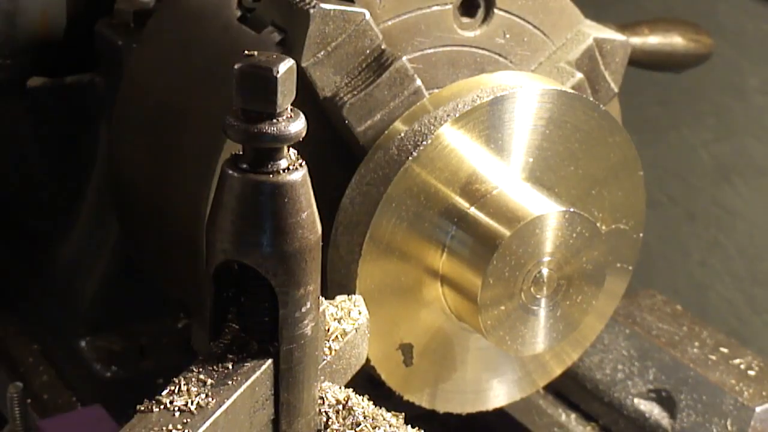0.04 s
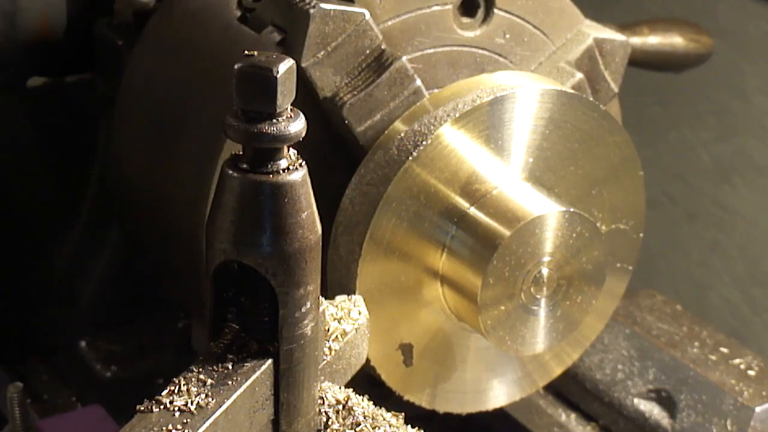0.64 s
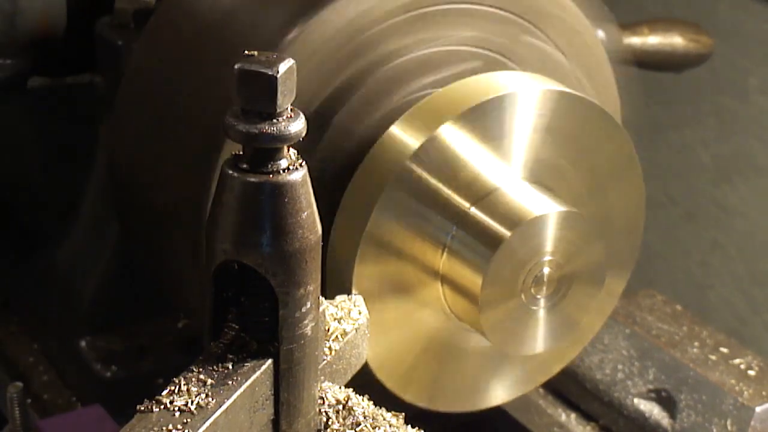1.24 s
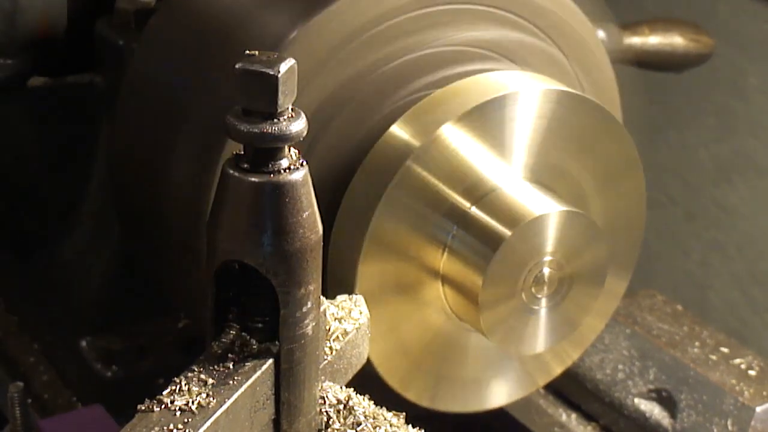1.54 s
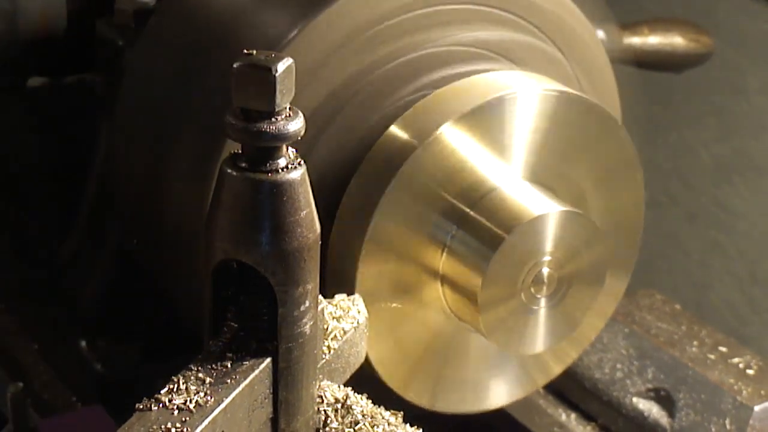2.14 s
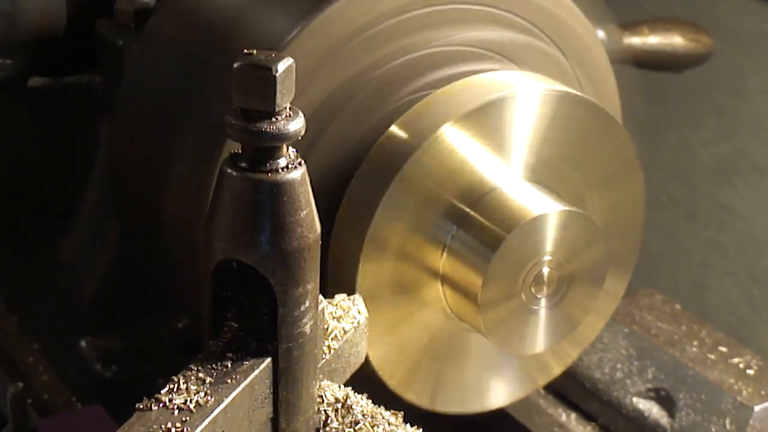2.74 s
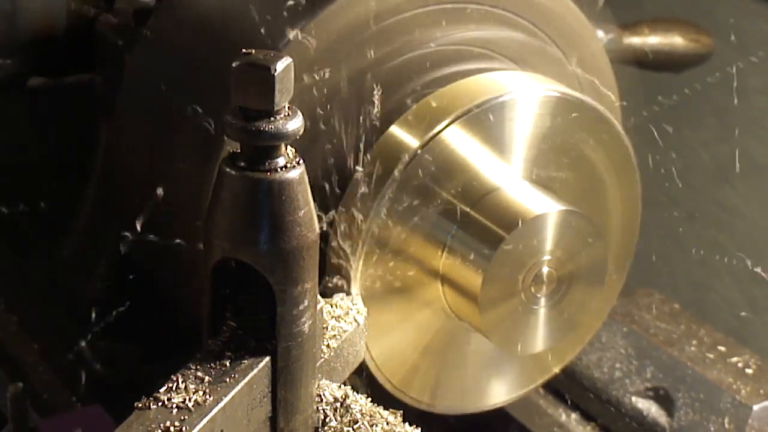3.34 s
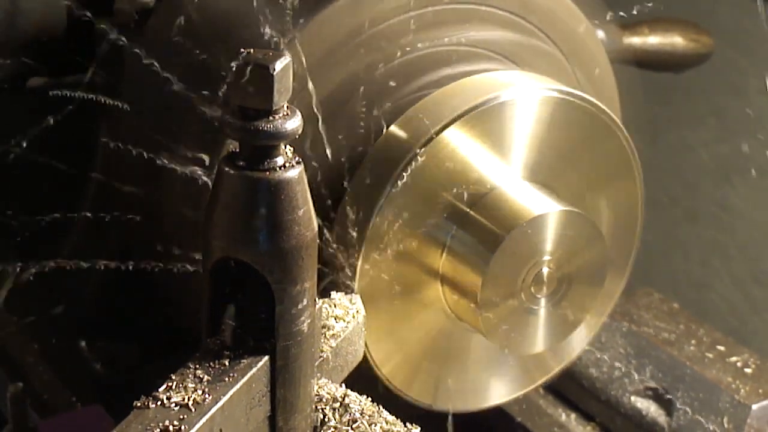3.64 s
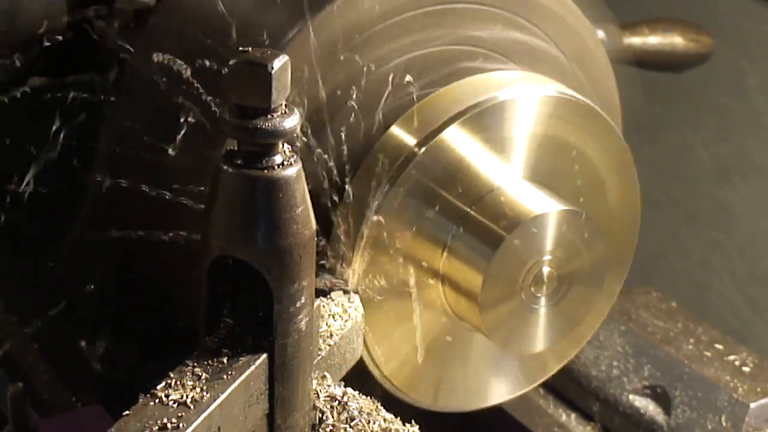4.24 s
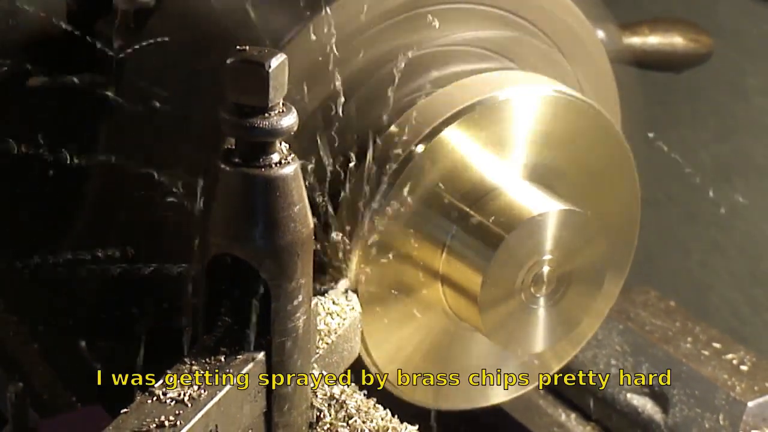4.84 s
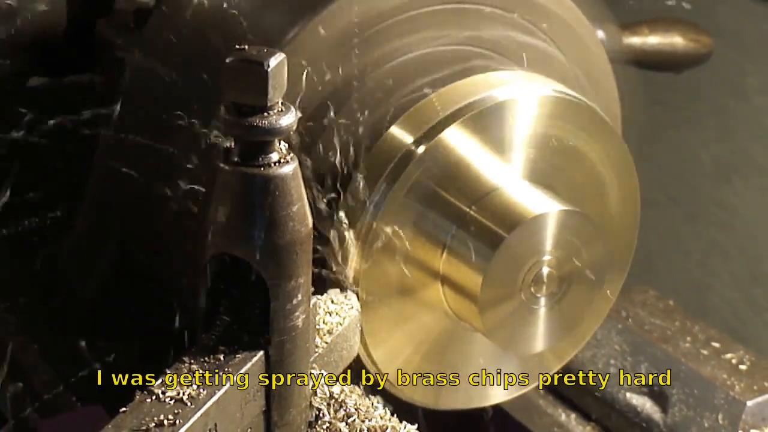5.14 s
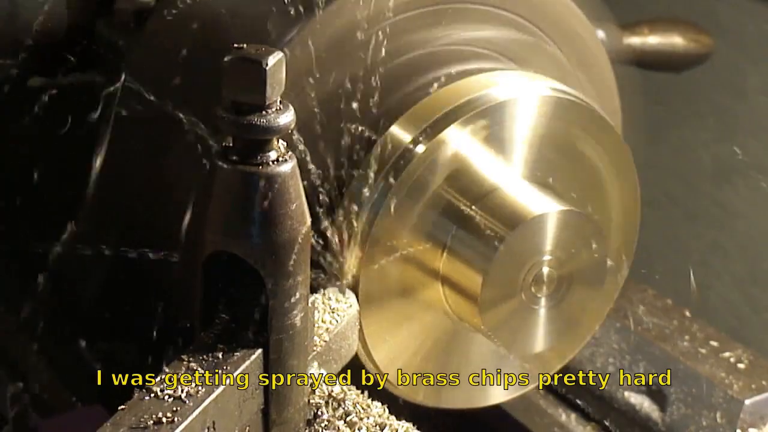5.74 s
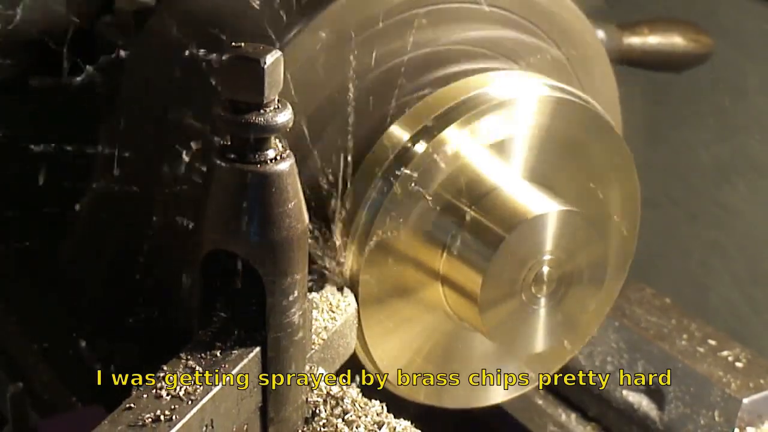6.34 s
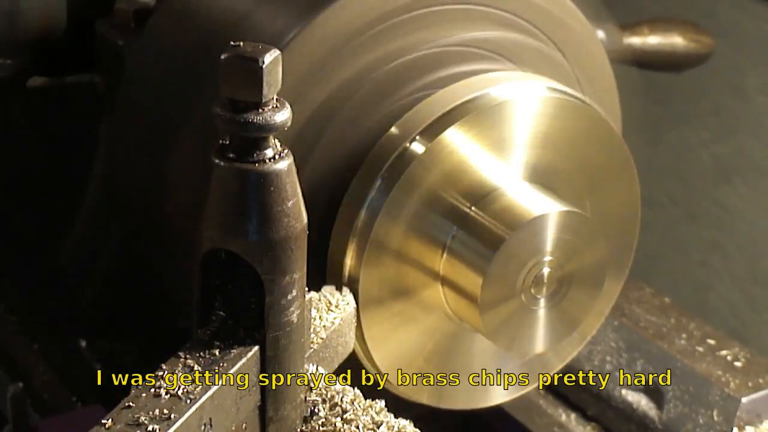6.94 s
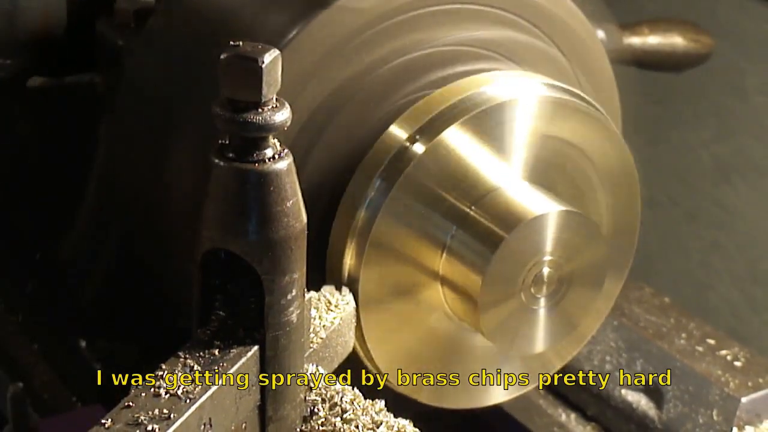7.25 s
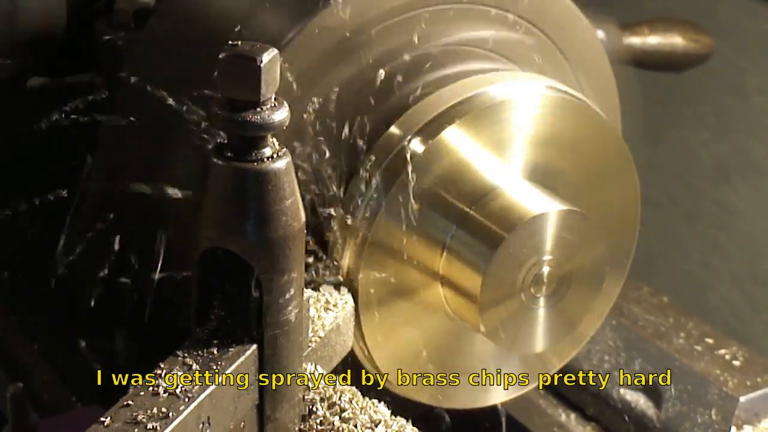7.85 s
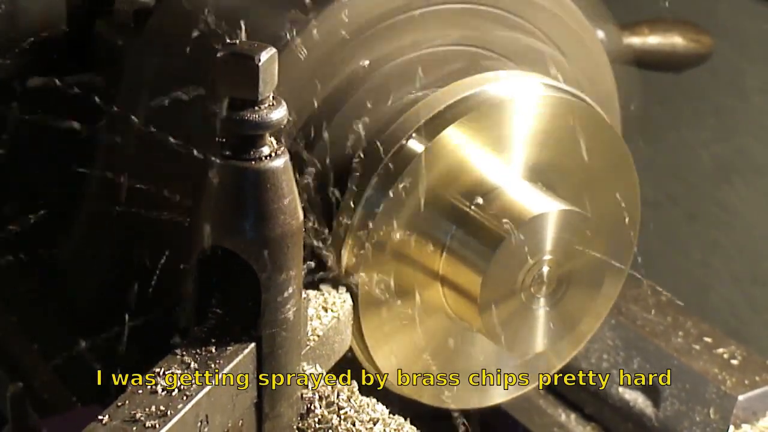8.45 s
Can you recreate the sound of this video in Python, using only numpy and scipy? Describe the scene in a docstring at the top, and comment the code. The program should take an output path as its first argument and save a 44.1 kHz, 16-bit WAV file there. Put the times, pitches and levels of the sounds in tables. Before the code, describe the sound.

A metal lathe starts up and cuts spinning brass with a bright crackling hiss, high squeals and chirps over its motor hum.

```python
"""Turning brass on a lathe

Close up in a small workshop, over the hiss of idling machinery, a motor starts, hums and whirs up to
speed, and the chuck clinks. The tool grazes a spinning brass blank, exciting a squeal once a turn,
then snags and bites: the loaded drive whines, and chips crackle and chirp as they fracture.
The tool is eased off, the brass squeals again, and the cut goes on."""
import sys
import numpy as np
from scipy import signal
from scipy.fft import rfft, irfft, next_fast_len
from scipy.io import wavfile

SR = 44100
rng = np.random.default_rng(int(sys.argv[2]) if len(sys.argv) > 2 else 0)


def int16_out(signal):
    """Quantize to a 16-bit WAV file."""
    q = np.round(np.clip(np.atleast_2d(signal).T, -1, 1) * 32767)
    wavfile.write(sys.argv[1], SR, q.astype(np.int16))


N = 375291
T = np.arange(N) / SR
FREQS = np.maximum(np.fft.rfftfreq(N, 1 / SR), 1)
START_S = 1.112   # the motor is switched on
RUN_TIME = np.maximum(T - START_S, 0)

# feeds of the tool: bite t/s, lift t/s, load (0-1), feed-in time/s
FEEDS = [(3.075, 6.846, 0.91, 0.37), (7.104, 8.6, 0.37, 0.082), (7.5, 8.6, 0.48, 0.1)]
# spectra of the tool tip rubbing, cutting and snagging: f/Hz, spectral level/dB
RUB_SPECTRUM = [(200, -42), (1500, -21), (3300, 5.5), (4200, 5), (4600, 7.5), (5150, -1), (5800, 2),
                (7000, 5.5), (7900, 1.5), (9000, -3.5), (11500, -7.5), (13200, -7), (14200, -11),
                (16000, -11)]
CUT_SPECTRUM = [(1500, -39), (3300, -1), (3750, 7.5), (4500, 3), (4900, 1), (5400, 10), (6700, 6),
                (7500, 10.5), (8700, 4), (10300, -2), (11500, -1), (13600, 4), (16000, -8.5)]
SNAG_SPECTRUM = [(1500, -37), (3400, -7), (4700, -4), (5400, 7), (6500, -12), (7900, 12), (9000, -10),
                 (11500, -20), (13200, -4), (16000, -21)]
# resonances of the tool: f/Hz, bandwidth/Hz, lift/dB
TOOL_MODES = [(4550, 150, 3), (7980, 350, 7), (13300, 1200, .5)]
TURN_S, SLOWED_TURN_S, CHATTER_S = .0402, .0407, .0252   # periods: free turn, dragged turn, tool chatter
GRAZE_HZ, SQUEAL_HZ = 7540, 8070   # ring of the blank, touched lightly and pressed
# grazing passes: start t/s, end t/s, period/s, f/Hz, touches per period, warble swing/Hz,
# first touch level/dB, settled touch level/dB, warble level/dB, touch decay time/s
GRAZING_PASSES = [(2.016, 3.095, TURN_S, GRAZE_HZ, 1, 500, -27.5, -40, -45.5, 0.0025),
                  (3.1, 3.223, TURN_S, GRAZE_HZ, 1, 350, -28.5, -39, -51, 0.0066),
                  (4.834, 6.907, CHATTER_S, SQUEAL_HZ, 1, 60, -41, -46.5, -61, .005),
                  (6.916, 7.19, SLOWED_TURN_S, SQUEAL_HZ, 2, 300, -41, -36, -49, .004),
                  (7.1975, 7.485, SLOWED_TURN_S, SQUEAL_HZ, 2, 480, -33.5, -22, -39, 0.0039),
                  (7.521, 8.52, CHATTER_S, SQUEAL_HZ, 1, 60, -37, -46, -59, .0043)]
# overtones that each touch excites in the blank: f/Hz, relative level/dB
BLANK_OVERTONES = [(13100, -25), (15100, -25)]
# chips that squeak as they tear off: t/s, relative level/dB, nominal f/Hz
CHIP_SQUEAKS = [(4.34, -31, 11300), (4.933, -23, 9800), (5.044, -24, 10270), (5.158, -27, 10440),
                (5.434, -24, 9650), (5.7056, -23, 9600), (6.196, -26, 9800), (6.2514, -21.5, 9500),
                (6.3628, -19.5, 9040), (6.4185, -24, 9360), (6.535, -20.5, 9100), (6.596, -21, 9430),
                (6.6596, -17.5, 9100), (6.725, -23, 9060), (6.7853, -21, 9040), (6.8506, -20.5, 8670),
                (7.749, -24, 10050), (7.8141, -20.5, 8000), (7.8798, -20.5, 8940), (7.945, -21.5, 9330),
                (8.001, -22.5, 9170), (8.1092, -22.5, 9400), (8.2236, -20.5, 9400), (8.284, -19.5, 9600),
                (8.3443, -20, 8360), (8.405, -21, 9200), (8.4678, -22.5, 9640)]
# the edge catches on the blank's high spot: t/s, level/dB
SNAG_TICKS = [(3.0866, -32), (3.154, -34), (3.1964, -34), (3.2398, -35), (3.2995, -37), (3.3435, -36),
              (3.3906, -40)]
# close tones of the drive while the tool cuts: f/Hz, level at full load/dB
LOADED_WHINE_TONES = [(2790, -60), (3112, -50.5), (3148.5, -53), (3185, -50.5), (3192, -52.5),
                      (3224, -57.5), (3305, -62), (3428, -57.5), (3545, -57.5)]
# supply hum with side tones of the drive: f/Hz, wander/Hz, relative level/dB free, the same loaded
HUM_PARTIALS = [(277, 2, -26, -31), (360, .3, -14.5, -12.8), (404, 1, -33, -18), (441, 1, -33, -18.5),
                (638, 1, -30, -20), (683.5, 3, -20, -5), (720, 1.2, 0, -.7), (764, 2, -25, -17),
                (801, 1.5, -21, -6.5), (845, 1.5, -25, -13), (882, 1.5, -25, -13), (927, 2, -25, -15),
                (1080, .6, -12.5, -5.5), (1242, 2, -22, -14)]
# whine of motor and gears: f/Hz, flutter/Hz, flicker weight, relative level/dB free, the same loaded
WHINE_PARTIALS = [(1185, 12, 3, -56, -67), (2031, 12, 2, -60, -58), (2189, 24, 3, -55, -63),
                  (3150, 18, 2, -55, -66), (3429, 6, 1, -47, -72), (3472, 6, 2, -68, -57),
                  (3789, 4, 1.2, -51.5, -82), (4560, 40, 3, -64, -64), (7167, 13, 3, -57.5, -57.5)]
# run-up of the spindle: t/s, share of full speed
SPINDLE_SPEED = [(1.112, .2), (1.15, .38), (1.19, .57), (1.24, .715), (1.3, .81), (1.35, .85), (1.4, .935),
                 (1.47, .99), (1.53, 1)]
# gear meshes in the run-up: full-speed f/Hz, relative level/dB, running time before fading/s
GEAR_MESHES = [(2450, -12, .2), (2790, -4, .16), (3150, -8, .34), (3429, -2, .36), (3789, -5.5, .39),
               (4400, -15, .15), (5900, -14, .09), (6400, -16, .25), (6760, -14, .25), (7167, -13.5, .24)]
# resonances of the drive and of the headstock casting: f/Hz, bandwidth/Hz, lift/dB
DRIVE_MODES = [(2030, 150, 11), (2760, 100, 4), (3130, 80, 10), (3380, 120, 5), (5350, 800, 11)]
CASTING_MODES = [(520, 18, 1.5), (2190, 374, 10.3), (2727, 114, 6.3), (3130, 150, 6.6), (3566, 56, 5.4)]
# spectra of the headstock's rattle and the belt guard's shudder: f/Hz, spectral level/dB
RATTLE_SPECTRUM = [(30, -56), (100, -35.5), (170, -25.5), (240, -25), (400, -14), (600, -10), (760, -0.5),
                   (1100, 3), (1700, -4.5), (2450, -10.5), (3300, -4), (4200, -13.5), (8000, -33)]
GUARD_SPECTRUM = [(30, -29), (200, -24), (520, -23), (700, 5), (1050, 3), (1500, -2), (2100, 5),
                  (2600, -16), (5000, -21)]
# envelope of the headstock's rattle: t/s, relative level/dB
RATTLE_LEVELS = [(1.3, -38.5), (1.4, -34), (1.46, -39), (1.85, -40), (2.56, -42.5), (3.46, -42),
                 (6.23, -42), (6.8, -45), (6.98, -42), (7.27, -40), (7.29, -44), (8.5, -42.5)]
# modulation by shafts and belt: f/Hz, depth free/dB, depth loaded/dB
SHAFT_THROBS = [(12.45, 1.2, 0), (19.9, .85, .7), (22.6, .6, 0), (36.7, .4, .55), (43.7, .4, .55)]
# modes of the chuck: f/Hz, relative level/dB, t60/s
CHUCK_MODES = [(2720, -2, .1), (4560, 5, .05), (5700, -1, .05), (6150, -1, .05), (6760, 5, .08),
               (7140, 9, .14), (10200, 1.5, .075)]
# clinks of the spinning chuck: t/s, impulse level/dB
CHUCK_CLINKS = [(1.311, -47), (1.3527, -44), (1.4146, -45), (1.5498, -45), (1.6286, -52), (1.7069, -43),
                (1.7623, -40), (2.1639, -45), (2.3649, -59), (2.5211, -53), (2.566, -44)]
# knocks and pings of metal: t/s, level/dB, f/Hz, bandwidth/Hz, t60/s
METAL_KNOCKS = [(1.113, -34, 810, 300, 0.35), (1.111, -33, 6260, 5000, 0.076),
                (1.143, -45, 800, 400, 0.054), (1.205, -36, 13050, 500, 0.2),
                (1.391, -27, 3350, 604, 0.043), (4.163, -33, 1080, 390, 0.046)]
# hiss of idling machinery: f/Hz, spectral level/dB
IDLE_SPECTRUM = [(30, -46), (100, -39), (200, -24), (310, -14), (380, -17), (600, -9), (780, -0.5),
                 (1300, -6.5), (2800, -3.5), (4200, -6), (5200, -10), (7500, -11), (10000, -18),
                 (16000, -27)]
# resonances in that hiss: f/Hz, bandwidth/Hz, lift/dB
IDLE_MODES = [(510, 60, 9), (1070, 90, 6), (1556, 30, 6), (2120, 110, 4), (2757, 25, 5), (4156, 16, 9),
              (4330, 16, 8)]
# stereo width: f/Hz, side level relative to mid/dB
SIDE_SPECTRUM = [(3300, -77), (3700, -109), (4300, -21.5), (6300, -7.5), (8000, -19.5), (10500, -4),
                 (15000, -7.5)]


def tool_tip(speed, early_loudness, load, jolt_db, throb_db, sizzle_s=1.75):
    """Friction and fracture: a light rub gives way to the crackle of brass breaking into fine chips."""
    rub = grains(20000, 1.2) * from_db(throb_db + 1.5 * drift(60))
    rub = rms_one(shaped(rub, colour(RUB_SPECTRUM)))
    chips = grains(7000, .85) * from_db(throb_db + 1.6 * drift(34))
    chips = rms_one(shaped(chips, colour(CUT_SPECTRUM, TOOL_MODES)))
    cut_s = np.maximum(T - FEEDS[0][0], 0)
    dulled = 1 - lasting(cut_s, sizzle_s, order=8)   # the fresh edge sizzles, then dulls
    sizzle = from_db(-54.5 - 11 * dulled + 1.5 * drift(25)) * narrow_noise(13220, 130)
    cleaned = np.minimum(cut_s, 1)   # a clean rim rubs more softly
    rubbing = from_db(-42 + 5 * early_loudness - .5 * cleaned) * speed ** 7 * rub
    cutting = from_db(-41) * chips + sizzle
    bite = np.clip(1.09 * load, 0, 1)
    return from_db(1.97 * jolt_db) * (np.sqrt(1 - bite) * rubbing + np.sqrt(bite) * cutting)


def tool_load(lift_s=.14):
    """Load follows feed: each cut ramps in, holds and falls as the tool is drawn clear (0-1)."""
    load = sum(depth * np.clip((T - bite) / feed_s, 0, 1) * np.clip(1 - (T - lift) / lift_s, 0, 1)
               for bite, lift, depth, feed_s in FEEDS)
    return np.clip(load, 0, 1)


def cutting_force(load, snaps_per_s=13, depth_db=1.44, strain_db=.16, relief_db=1, width_s=.016):
    """Stress and release, in dB: force throbs as chips snap, builds before a squeak and drops after."""
    cycle = np.cumsum(snaps_per_s * (1 + .09 * drift(1.9))) / SR % 1
    jolt = np.exp(-cycle / .079)
    lag = T[:SR // 10] - .05
    strain = strain_db * np.exp(-((lag + .0039) / width_s) ** 2)
    relief = relief_db * np.exp(-((lag - .012) / width_s) ** 2)
    tears = impulses([(s, 0) for s, *_ in CHIP_SQUEAKS])
    return depth_db * load * (jolt - jolt.mean()) + signal.fftconvolve(tears, strain - relief, "same")


def blank_squeal(rise_s=.0014, settle_share=.39, offbeat_db=-6):
    """Periodic excitation: the blank rings at each touch of the tool; between, its pitch arches up."""
    out, touches = np.zeros(N), np.zeros(N)
    waver_hz = 70 * (drift(120) + drift(350))
    flicker = from_db(3 * drift(70))
    for start, end, period_s, hz, count, swing_hz, first_db, last_db, warble_db, fall_s in GRAZING_PASSES:
        during = (T > start) * np.clip((end - T) / .004, 0, 1)
        settling = np.exp(-np.maximum(T - start, 0) / (settle_share * (end - start)))
        pressure_db = (first_db - last_db) * settling
        gap_s = period_s / round(count)
        age = (T - start) % gap_s
        offbeat = (T - start) % period_s > gap_s   # a second touch in a turn is weaker
        envelope = np.minimum(age / rise_s, 1) * np.exp(-np.maximum(age - 2 * rise_s, 0) / fall_s)
        touch = during * from_db(last_db + pressure_db + offbeat_db * offbeat) * envelope
        arch = np.sin(np.pi * (age / gap_s) ** 1.4)
        pitch_hz = hz + swing_hz * (1 + .2 * drift(16)) * arch + waver_hz
        warble = during * from_db(warble_db + .3 * pressure_db) * (.15 + 1.43 * age / gap_s) * flicker
        out += touch * tone(hz + waver_hz)
        out += warble * (.6 * tone(pitch_hz) + .8 * narrow_noise(pitch_hz, 200))
        touches += touch
    return out + touches * sum(from_db(db) * narrow_noise(hz, 150) for hz, db in BLANK_OVERTONES)


def chip_chirps(sweep_hz=3600, sweep_s=.00109, sag_hz=350, squeak_s=.0019, rasp_s=.0016):
    """Fracture transients: a tearing chip squeaks, dropping in pitch and breaking into a rasp."""
    out = np.zeros(N + SR)
    age = T[:SR // 25]
    ragged_hz = 380 * drift(350)
    noise = rng.standard_normal((len(CHIP_SQUEAKS), len(age)))
    grits = rms_one(signal.sosfilt(signal.butter(2, 1100, fs=SR, output="sos"), noise))
    for (s, db, hz), grit in zip(CHIP_SQUEAKS, grits):
        at = round(s * SR)
        stretch, phase = rng.standard_normal(2)
        glide = np.exp(-age / (sweep_s * from_db(4.7 * stretch)))
        pitch_hz = hz - sag_hz + sweep_hz * glide + np.resize(ragged_hz[at:], len(age))
        carrier = np.sin(2 * np.pi * np.cumsum(pitch_hz) / SR + phase)
        squeak = age / squeak_s * np.exp(1 - age / squeak_s) * carrier
        rasp = age / rasp_s * np.exp(1 - age / rasp_s) * grit * np.sin(2 * np.pi * (hz + 450) * age)
        out[at:at + len(age)] += from_db(db - 7) * squeak + from_db(db - 10.5) * rasp
    return out[:N]


def edge_snags():
    """Intermittent contact: until the cut goes all the way round, the edge ticks on the high spot."""
    grit = rms_one(shaped(rng.standard_normal(N), colour(SNAG_SPECTRUM)))
    return grit * decay(impulses(SNAG_TICKS), t60=.074)


def loaded_whine(load, jolt_db):
    """Beating: close tones near 3.2 kHz wander together and interfere while the tool cuts."""
    wander_hz = 6 * drift(12)
    cluster = sum(from_db(db) * tone(hz + wander_hz + .6 * drift(4)) for hz, db in LOADED_WHINE_TONES)
    return load * from_db(1.2 * jolt_db) * cluster


def motor_hum(inrush, early_loudness, load):
    """Forced vibration: supply ripple drives a hum, whose side tones grow as the drive labours."""
    hum = 0
    for hz, wander_hz, free_db, loaded_db in HUM_PARTIALS:
        partial = tone(hz + wander_hz * drift(7.85))
        hum += partial * from_db(free_db + load * (loaded_db - free_db) + (1.7 + .56 * load) * drift(25))
    return from_db(-44.5 + 5.5 * inrush + 2 * early_loudness - 2 * load) * hum


def motor_whine(early_loudness, load, jolt_db):
    """Frequency modulation: the whine wavers with motor speed; load shifts the balance of its tones."""
    waver = 1 + (.0005 + .0009 * load) * drift(6)
    swell_db = 1.5 * early_loudness + 2.6 * jolt_db
    whine = 0
    for hz, flutter_hz, flicker, free_db, loaded_db in WHINE_PARTIALS:
        level_db = (1 - load) * (free_db + 2.5) + load * (loaded_db + 3) + swell_db
        flicker_db = 4.3 * flicker * np.tanh(.35 * drift(18))
        whine += tone(hz * waver + flutter_hz * drift(15)) * from_db(level_db + flicker_db)
    up_to_speed = np.clip((T - 1.38) / .12, 0, 1)
    return up_to_speed * whine


def gear_whirr(speed, fade_db_per_s=28):
    """Swept resonance: mesh tones climb through the drive's modes and fade as the strain eases."""
    whirr = 0
    for full_hz, db, fade_s in GEAR_MESHES:
        pitch_hz = full_hz * speed
        envelope = from_db(db + 2 * drift(50)) * lasting(RUN_TIME, fade_s, order=10)
        mesh = .85 * tone(pitch_hz + .011 * full_hz * drift(70))
        roughness = .65 * narrow_noise(pitch_hz, .04 * full_hz)
        whirr += envelope * (mesh + roughness)
    return shaped(from_db(-36.5 - fade_db_per_s * RUN_TIME) * whirr, colour([(1, 0)], DRIVE_MODES))


def headstock(speed, inrush, jolt_db, throb_db):
    """Impact noise: bearings and gears excite the casting; the belt guard shudders at the start."""
    rattle = grains(5000, 1.36) * from_db(1.03 * drift(33) + throb_db)
    casting = rms_one(shaped(rattle, colour(RATTLE_SPECTRUM, CASTING_MODES)))
    guard = rms_one(shaped(rattle, colour(GUARD_SPECTRUM)))
    return speed ** 3 * from_db(in_time(RATTLE_LEVELS) + 2 + jolt_db) * casting + from_db(-37) * inrush * guard


def chuck(speed, early_loudness, load, jingles_per_s=90):
    """Modal ringing: slack jaws jingle, less as the cut pulls them tight; a few clinks stand out."""
    clinks = impulses(CHUCK_CLINKS)
    slack = speed ** 6 * (1 - load) * from_db(-58 + 7 * early_loudness)
    jingle = slack * (rng.random(N) < jingles_per_s / SR)
    crack = decay(clinks, t60=.071) * rng.standard_normal(N)
    out = from_db(3) * shaped(crack, np.minimum(FREQS / 4000, 1) ** 2)
    for hz, db, t60 in CHUCK_MODES:
        radius, angle = from_db(-60 / (t60 * SR)), 2 * np.pi * hz / SR
        blows = clinks + jingle * rng.standard_normal(N) + 1e-18
        ring = signal.lfilter([.5, 0, -.5], [1, -2 * radius * np.cos(angle), radius ** 2], blows)
        out += from_db(db) * ring
    return out


def metal_knocks():
    """Damped resonance: each short blow dies away in a single band of noise."""
    out = np.zeros(N + SR)
    age = T[:SR // 2]
    for s, db, hz, width_hz, t60 in METAL_KNOCKS:
        ring = signal.lfilter(*signal.iirpeak(hz, hz / width_hz, fs=SR), rng.standard_normal(len(age)))
        at = round(s * SR)
        out[at:at + len(age)] += from_db(db - 60 * age / t60) * rms_one(ring)
    return signal.sosfilt(signal.butter(2, 450, "high", fs=SR, output="sos"), out[:N])


def shaft_throb(load):
    """Amplitude modulation by the turning shafts and belt, in dB."""
    return sum((free + load * (loaded - free)) * np.cos(2 * np.pi * (hz * T + rng.random()))
               for hz, free, loaded in SHAFT_THROBS)


def idling_machinery(sag_at_s=.284, sag_s=.37, sputter_hz=19.6, sink_db=14.5, sink_s=.9):
    """Filtered noise: a fluttering hiss that sags and sputters once, then sinks when the lathe runs."""
    sag = np.sqrt(np.abs(np.sin(np.pi * np.clip((T - sag_at_s) / sag_s, 0, 1))))
    sputter = np.sin(2 * np.pi * sputter_hz * (T - sag_at_s))
    level_db = -41 - sag * (3 + 2 * sputter) - sink_db * np.minimum(RUN_TIME / sink_s, 1)
    hiss = rms_one(shaped(grains(9000, .96), colour(IDLE_SPECTRUM, IDLE_MODES)))
    return hiss * from_db(level_db + .87 * drift(36))


def echoes(x, t60):
    """Reverberation: dense reflections from the machine and the walls, of unit energy gain."""
    age = T[:SR // 3]
    tail = rng.standard_normal(len(age)) * from_db(-60 * age / t60) * (age > .002)
    return signal.fftconvolve(x, tail / np.sqrt(np.sum(tail ** 2)))[:N]


def from_db(db):
    """Level to amplitude ratio."""
    return 10 ** (np.asarray(db) / 20)


def rms_one(x):
    """Normalisation to unit power."""
    return x / np.sqrt(np.mean(np.abs(x) ** 2) + 1e-20)


def in_time(points):
    """Linear interpolation of (t/s, value) at every sample."""
    return np.interp(T, *np.transpose(points))


def lasting(age, length_s, order=4):
    """An envelope that holds near 1, is half at length_s, then dies away."""
    return 1 / (1 + (np.maximum(age, 0) / length_s) ** order)


def colour(points, resonances=()):
    """Frequency response: a smooth spectrum lifted by resonance peaks."""
    hz, db = np.transpose(points)
    lift = sum(peak / (1 + (2 * (FREQS - centre) / width) ** 2) for centre, width, peak in resonances)
    return from_db(np.interp(np.log(FREQS), np.log(hz), db) + lift)


def shaped(x, gain):
    """Filtering by a gain per frequency."""
    size = next_fast_len(N)
    return irfft(rfft(x, size) * np.interp(np.fft.rfftfreq(size, 1 / SR), FREQS, gain), size)[:N]


def drift(corner_hz):
    """Random fluctuation: low-passed noise of unit power."""
    step = 40   # samples per control point
    pole = np.exp(-2 * np.pi * corner_hz * step / SR)
    noise = rng.standard_normal(N // step + 2002)
    slow = signal.lfilter([1], [1, -2 * pole, pole ** 2], noise)[2000:]
    return np.interp(np.arange(N) / step, np.arange(len(slow)), rms_one(slow))


def tone(hz):
    """A sinusoid of unit power that follows a frequency curve."""
    return np.sqrt(2) * np.sin(2 * np.pi * (np.cumsum(hz) / SR + rng.random()))


def narrow_noise(hz, width_hz):
    """Narrow-band noise of unit power about a steady or moving frequency."""
    phase = 2 * np.pi * np.cumsum(hz + np.zeros(N)) / SR
    return drift(width_hz) * np.cos(phase) + drift(width_hz) * np.sin(phase)


def grains(per_s, spread_db):
    """Shot noise: random clicks of uneven size, unit power."""
    sizes = from_db(spread_db * np.minimum(rng.exponential(1, N), 4)) * rng.choice([-1, 1], N)
    return rms_one(sizes * (rng.random(N) < per_s / SR))


def impulses(rows):
    """One impulse for each row of (t/s, level/dB)."""
    s, db = np.transpose(rows)
    return np.bincount(np.round(s * SR).astype(int), from_db(db), N)[:N]


def decay(clicks, t60):
    """An exponential decay from each impulse."""
    return signal.lfilter([1], [1, -from_db(-60 / (t60 * SR))], clicks + 1e-18)


def scene():
    """Superposition: speed and load drive the lathe, straight ahead; only treble spreads sideways."""
    running = np.clip(RUN_TIME / .013, 0, 1)
    speed, load = in_time(SPINDLE_SPEED), tool_load()
    inrush = lasting(RUN_TIME, length_s=.073)   # the motor strains as it starts
    early_loudness = lasting(RUN_TIME, length_s=.87)   # the level is higher at first, then settles
    jolt_db, throb_db = cutting_force(load), shaft_throb(load)
    lathe = motor_hum(inrush, early_loudness, load) + motor_whine(early_loudness, load, jolt_db)
    lathe += gear_whirr(speed) + headstock(speed, inrush, jolt_db, throb_db)
    lathe += tool_tip(speed, early_loudness, load, jolt_db, throb_db)
    lathe += chuck(speed, early_loudness, load) + loaded_whine(load, jolt_db) + edge_snags()
    chirps = chip_chirps()
    chirps += from_db(-6.5) * echoes(chirps, t60=.03)   # off the blank's face and the tool post
    squeal = blank_squeal()
    mid = idling_machinery() + running * lathe + metal_knocks() + chirps + squeal
    mid += echoes(from_db(-6) * chirps + from_db(-11) * squeal, t60=.12)
    side = shaped(echoes(mid, t60=.2), colour(SIDE_SPECTRUM))
    return np.array([mid + side, mid - side])


def record(dry, bass_hz=80, cutoff_hz=15900):
    """Band limiting: a small microphone loses the deep bass, and the top is cut steeply."""
    thin = signal.sosfilt(signal.butter(2, bass_hz, "high", fs=SR, output="sos"), dry)
    return np.array([shaped(channel, 1.0 * (FREQS < cutoff_hz)) for channel in thin])


dry = scene()
out = record(dry)
int16_out(out)
```